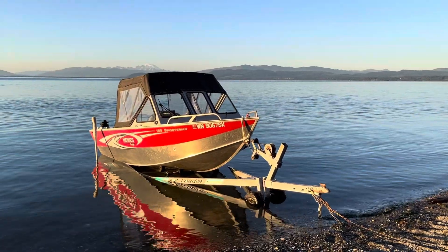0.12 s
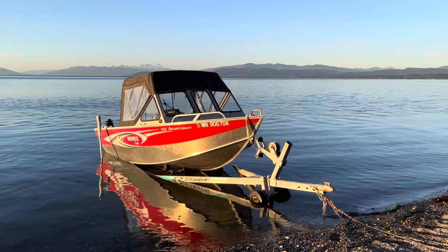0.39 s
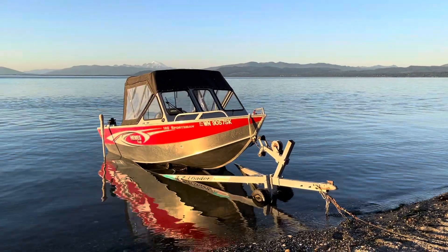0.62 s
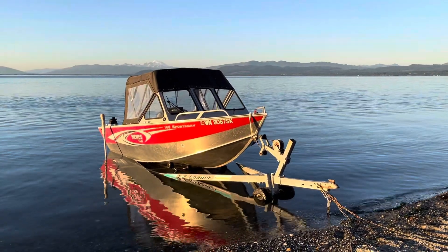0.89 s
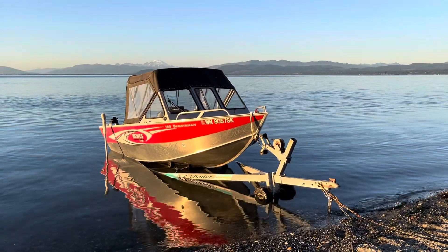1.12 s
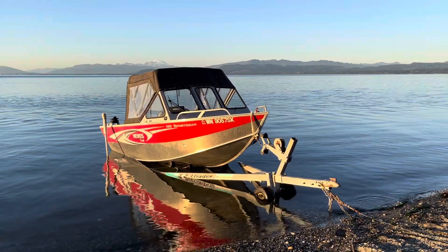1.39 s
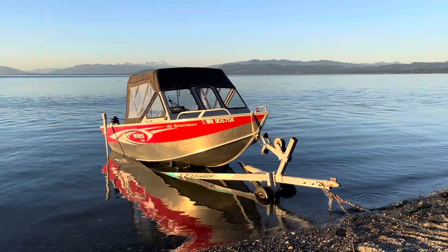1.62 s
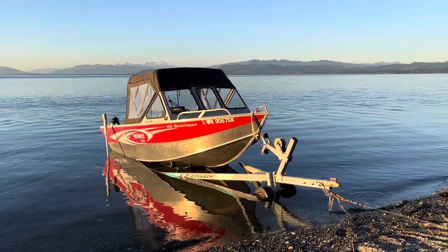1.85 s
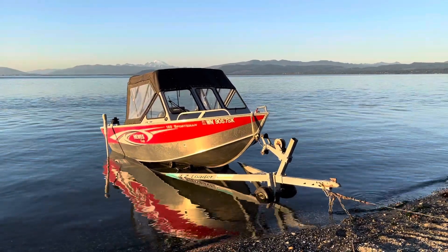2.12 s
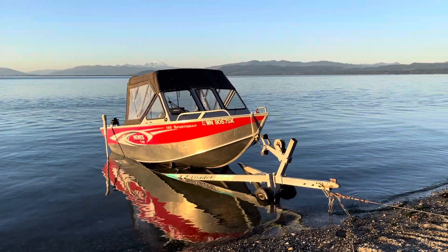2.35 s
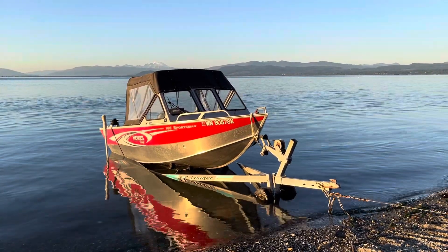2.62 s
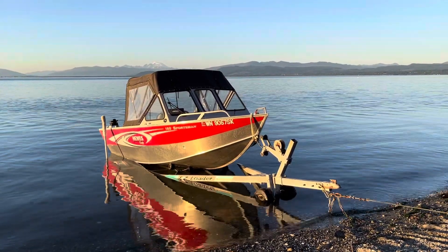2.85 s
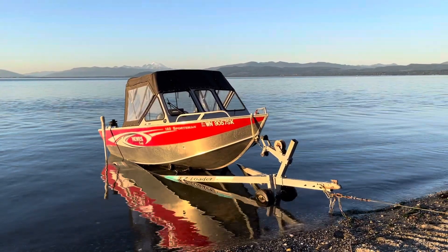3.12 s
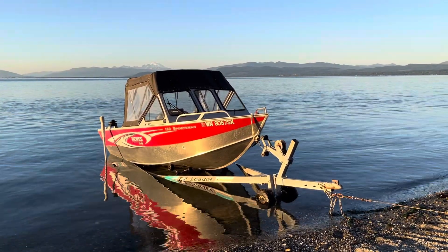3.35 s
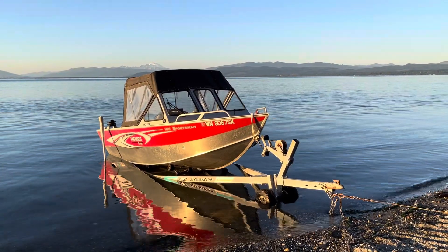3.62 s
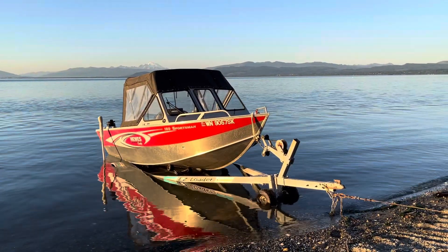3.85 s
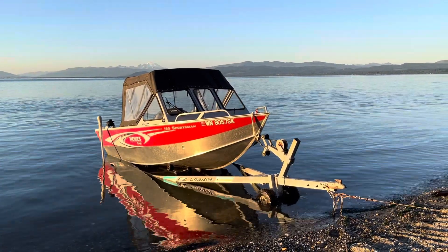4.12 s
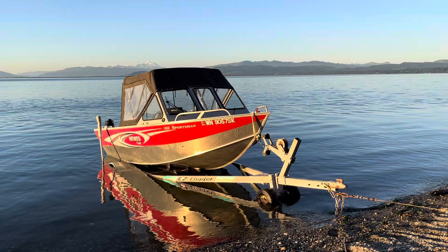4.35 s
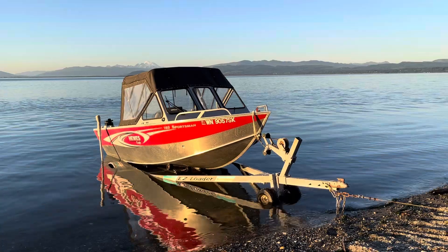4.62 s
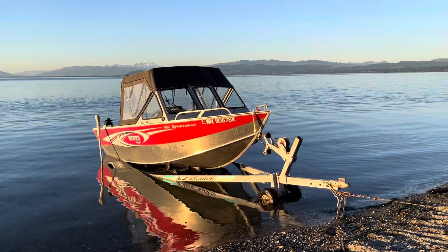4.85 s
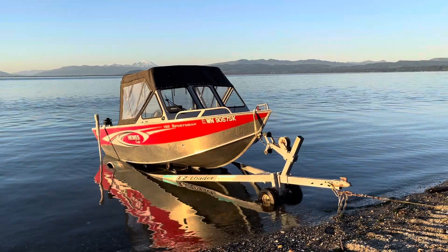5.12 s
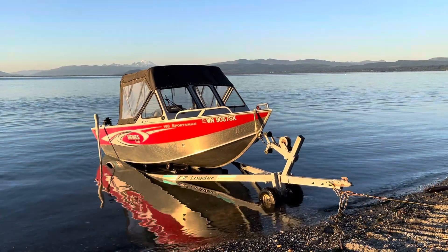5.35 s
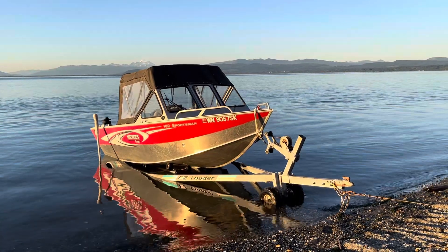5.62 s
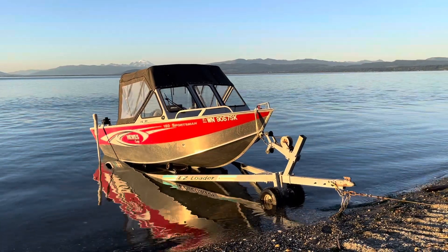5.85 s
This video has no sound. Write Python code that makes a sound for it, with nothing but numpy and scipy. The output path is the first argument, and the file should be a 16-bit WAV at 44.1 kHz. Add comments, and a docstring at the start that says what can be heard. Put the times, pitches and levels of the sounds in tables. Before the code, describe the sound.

A vehicle idles on a shingle beach, then a chain thumps tight and a metal trailer is dragged up with crunching gravel and clanking knocks.

```python
"""A vehicle idles on a shingle beach, then takes up the slack with a thump and drags a boat trailer up on a chain.
Its drone, clatter and hums are shaped noise and wavering sines; stones grind, crackle and snap as shaped noise.
Chain thumps and pings are damped sines, squeals are narrow bands of noise that swell as the steel rubs,
and the trailer frame is a set of resonances struck by short bursts of noise, one mode ringing on as a damped sine.
Two ports of a small microphone hear it all, vehicle to the right, with a lag and a likeness that change with pitch."""
import sys
import numpy as np
from scipy import signal
from scipy.fft import rfft, irfft, next_fast_len
from scipy.io import wavfile
from scipy.ndimage import map_coordinates

SR = 44100
rng = np.random.default_rng(int(sys.argv[2]) if len(sys.argv) > 2 else 0)


def digitize_waveform(pressure):
    """Quantize a signal to 16-bit integers and store it at the path in sys.argv[1].

    Rows of a 2-D input are taken as channels; values are limited to [-1, 1].
    """
    field = np.atleast_2d(pressure).T
    bounded = np.clip(field, -1, 1)
    quanta = np.round(bounded * 32767).astype(np.int16)
    wavfile.write(sys.argv[1], SR, quanta)


def decibels_to_gain(level_db):
    """Convert a level in decibels to a linear amplitude gain (20 dB per decade)."""
    exponent = np.asarray(level_db, float) / 20
    return 10 ** exponent


N = 263718
T = np.arange(N) / SR
LOAD_HZ = 116.4  # the exhaust note under load

# How hard the steel rubs, swelling about once a second. Each row: time in seconds, rub in dB.
RUB = [(1.16, -71), (1.58, -66), (1.66, -71), (1.86, -70), (1.92, -64.5), (2.25, -64.5), (2.66, -65.5),
       (3.0, -71), (3.4, -64.5), (3.55, -65), (3.75, -69), (4.02, -67.5), (4.25, -63.5), (4.4, -65),
       (4.7, -71), (4.9, -68.5), (5.1, -66), (5.3, -62.5), (5.62, -68), (5.95, -64.5)]
# Resonances of the trailer frame. Each row: centre in Hz, width in Hz, relative level in dB.
FRAME = [(825, 26, 5), (828, 172, 0), (958, 12, -0.5), (1193, 46, 2), (1290, 12.6, 2), (1381, 13, 9),
         (1235, 780, -7.5), (1397, 22, 7), (1572, 10, 0.5), (1834, 21, -1), (2211, 22, 1), (2286, 68, -4.5),
         (2170, 350, -10.5), (2390, 56, 6), (2513, 28, 6), (2556, 39, 0.5), (2850, 39, 1), (3126, 41, -3.5),
         (3400, 83, -1.5), (3470, 2340, -10), (3760, 60, -7), (4597, 46, -5.5), (5200, 41, -22)]


def unit(x):
    """Scaled to rms 1."""
    return x / np.sqrt(np.mean(x ** 2) + 1e-20)


def along(points, hz):
    """Values between (Hz, value) points, on a log frequency axis."""
    f, v = np.transpose(points)
    return np.interp(np.log(hz + 1), np.log(f + 1), v)


def curves(rows):
    """One gain per sample for each dB column, at -120 dB before the first row."""
    s, *cols = np.transpose(rows)
    return [decibels_to_gain(np.interp(T, s, c, left=-120)) for c in cols]


def wobble(rate):
    """A smooth random curve with rate knots a second, at most 60."""
    knots = rng.standard_normal(int(N * 60 / SR) + 4)
    return map_coordinates(knots, [T * min(rate, 60)])


def filtered(x, response):
    """x times a complex response of frequency."""
    m = next_fast_len(N + 8192)
    return irfft(rfft(x, m) * response(np.fft.rfftfreq(m, 1 / SR)), m)[..., :N]


def modes(table):
    """Causal response of resonances (Hz, width Hz, dB), summed with alternating sign."""
    def response(f):
        return sum((-1) ** k * decibels_to_gain(db) * 1j * f * width / (hz * hz - f * f + 1j * f * width)
                   for k, (hz, width, db) in enumerate(table))
    return response


def even(response):
    """The response scaled so that white noise keeps its level."""
    def scaled(hz):
        gain = response(hz)
        return gain / np.sqrt(np.mean(abs(gain) ** 2))
    return scaled


def noise():
    """Two unrelated draws: the direct path and the scattered one."""
    return rng.standard_normal((2, N))


def coloured(x, spectrum):
    """x through a spectrum, rms 1."""
    return unit(filtered(x, lambda hz: decibels_to_gain(along(spectrum, hz))))


def grit(rate, spread_db):
    """Single stone contacts at random moments, rate a second, some larger than the rest."""
    hit = rng.random(N) < rate / SR
    size = np.minimum(rng.exponential(size=N), 3)
    return unit(hit * decibels_to_gain(spread_db * size) * noise())


def ring(s, db, hz, t60, attack):
    """A damped sine that starts at s and dies by 60 dB in t60 seconds."""
    t = np.clip(T - s, 0, None)
    return decibels_to_gain(db - 60 * t / t60) * (1 - np.exp(-t / attack)) * np.sin(2 * np.pi * hz * t)


def engine(drone):
    """Exhaust rumble in the body's resonances, a few unsteady hums and the idle's clatter."""
    # Colour of the rumble. Each row: pitch in Hz, relative dB per Hz.
    drone_colour = [(20, -29), (45, -7.5), (62, 2.5), (100, -2.5), (200, -1), (270, -2.5), (340, -5),
                    (420, -8), (510, -15.5), (620, -11.5), (800, -18.5), (1100, -35), (1600, -56.5)]
    # Body resonances in the rumble. Each row: centre in Hz, width in Hz, level in dB.
    booms = [(118.1, 4.7, 3), (160.3, 20, -8.5), (305.5, 10, -2)]
    # The exhaust note under load. Each row: time in seconds, level in dB before the 2 dB cut below.
    load = [(1.4, -68), (1.73, -36.5), (2.14, -63), (2.32, -33), (2.65, -54), (2.94, -37.5), (3.11, -43),
            (4.1, -39), (4.25, -32), (4.93, -43.5), (5.16, -33), (5.58, -49), (5.73, -30), (5.98, -42)]
    # Each row: pitch in Hz, rms in dB before fade and fade-in, start in seconds, waver in radians, fade in dB per s.
    hum_rows = [(85.46, -51, -0.9, 2.03, 5), (218.2, -42, 0.52, 0.86, 1), (306.3, -53.5, 1.14, 1.8, 2),
                (362.8, -49.5, 0.88, 0.32, 0)]
    # Colour of the clatter. Each row: pitch in Hz, relative dB per Hz.
    idle_colour = [(300, -70), (600, 7.5), (850, -34), (1050, -10.5), (1450, -2), (2100, -13.5),
                   (2600, -29), (3000, -36), (4400, -23), (6000, -44), (8000, -61), (12000, -83),
                   (16000, -67)]
    # Thin whistles in the clatter. Each row: centre in Hz, width in Hz, level in dB.
    fan = [(3350, 35, 15), (5150, 70, 5)]

    rumble = unit(filtered(coloured(noise(), drone_colour), lambda f: 1 + abs(modes(booms)(f))))
    rumble = drone * decibels_to_gain(1.6 * wobble(8)) * rumble

    load_level = curves(load)[0] * decibels_to_gain(3 * wobble(14) - 2)
    hums = load_level * np.sin(2 * np.pi * LOAD_HZ * T + 1.1 * wobble(12))
    for hz, db, start, waver, fade_db in hum_rows:
        phase = 2 * np.pi * hz * T + waver * wobble(7)
        level = decibels_to_gain(db - fade_db * T + 2 * wobble(4.786)) * np.sqrt(2)
        fade_in = np.clip((T - start) / (start + .3), 0, 1)  # a start below -0.3 s leaves the hum silent
        hums = hums + level * np.sin(phase) * fade_in

    clatter = filtered(coloured(noise(), idle_colour), lambda f: 1 + abs(modes(fan)(f)))
    clatter = decibels_to_gain(-55.5 + 0.22 * wobble(17.0)) * clatter
    return rumble + hums + clatter


def gravel(crunch, crackle):
    """Stones grind under the load in clumps; small ones crackle, and single snaps stand out."""
    # Colours of the grinding, the crackle and the snaps. Each row: pitch in Hz, relative dB per Hz.
    crunch_colour = [(400, -24), (800, -2.5), (1100, -4.5), (1430, 3), (1750, -10.5), (2450, -9),
                     (2650, -11.5), (3100, -17), (3800, -22.5), (5000, -20), (6500, -27), (9000, -54),
                     (9900, -55), (11000, -38)]
    crackle_colour = [(2500, -7), (4000, -0.5), (5500, -5), (7000, 2), (8500, -1.5), (10500, -2),
                      (12300, -3.5), (13200, -13), (14200, -7), (15600, -20)]
    snap_colour = [(2000, -25), (3500, -4), (5000, -10.5), (7500, 9), (10000, -3.5), (12500, 0),
                   (14000, -11), (15700, -11)]
    # The loudest snaps, of stones and at the onset of some blows. Each row: start in seconds, starting level in dB.
    loud_snaps = [(0.9852, -53), (1.091, -50), (1.1682, -52), (1.617, -43), (1.659, -43), (1.751, -44),
                  (1.7605, -49), (1.782, -42), (1.787, -35), (1.795, -34), (1.8055, -42), (1.808, -34),
                  (1.819, -34), (1.821, -34), (1.8255, -34), (1.8285, -32), (1.831, -38), (1.8415, -51),
                  (1.847, -38), (1.851, -42), (1.9155, -34.5), (1.931, -47), (1.9724, -28), (1.987, -47),
                  (1.9955, -44), (2.006, -41), (2.012, -41), (2.027, -38), (2.7895, -39), (3.031, -43),
                  (3.1377, -37), (3.2291, -46.5), (3.6993, -45), (3.8106, -45), (3.8456, -38), (4.42, -40),
                  (4.656, -46), (4.7576, -49), (4.941, -42), (5.342, -46), (5.5464, -43)]

    clumps = decibels_to_gain(2 * wobble(23) + 1.8 * wobble(9))
    grind = clumps * coloured(noise() + 0.21 * grit(900, spread_db=1.5), crunch_colour)

    flicker = decibels_to_gain(0.24 * wobble(13) + 1.8 * wobble(23))
    fizz = flicker * coloured(noise() + 0.79 * grit(500, spread_db=3.0), crackle_colour)

    # scattered lesser snaps lie 17 dB under the crackle's curve
    snaps = decibels_to_gain(-17) * crackle * grit(60, spread_db=2)
    t = np.arange(88) / SR
    bursts = rng.standard_normal((len(loud_snaps), 2, len(t)))
    for (s, db), burst in zip(loud_snaps, bursts):
        snaps[:, round(s * SR):][:, :len(t)] += decibels_to_gain(db - 60 * t / 0.0074) * unit(burst)
    snaps = filtered(snaps, even(lambda hz: decibels_to_gain(along(snap_colour, hz))))
    return crunch * grind + crackle * fizz + snaps


def chain():
    """The chain snaps tight with low thumps and loose links ping, all as damped sines."""
    # A first small tick of steel: start in seconds, level in dB, pitch in Hz, t60 in seconds.
    tick = (0.949, -53, 3150, .04)
    # The slack taken up. Each row: start in seconds, level in dB, pitch in Hz, t60 in seconds.
    thump_rows = [(1.197, -17, 125.5, 0.1), (1.216, -15, 150, 0.11), (1.233, -23, 297, 0.049),
                  (1.262, -16, 153, 0.025), (1.285, -15, 122.4, 0.056), (1.293, -31, 63.4, 0.39)]
    # Chain links. Each row: start in seconds, level in dB.
    pings = [(2.507, -50), (2.577, -50), (3.938, -54), (3.975, -46), (4.14, -49)]
    # Tones of one link. Each row: pitch in Hz, relative level in dB, t60 in seconds.
    link = [(8650, 0, .08), (9100, -2, .07)]

    thumps = sum(ring(*row, attack=0.0012) for row in thump_rows)
    links = sum(ring(s, db + level, hz, t60, attack=0.000097)
                for s, db in pings for hz, level, t60 in link)
    return thumps + ring(*tick, attack=0.001) + links


def squeals():
    """Rubbing steel slips unevenly and shakes with the engine's cycle, four exhaust beats long."""
    # Each row: pitch in Hz, width in Hz, shake 0-1, level in dB at a rub of -66 dB, dB gained per dB of rub.
    squeal_rows = [(5990, 70, 0, -67, 1.44), (5245, 31, 0, -80, 0.5), (4410, 50, 0.3, -67.5, 2),
                   (7737, 100, 0.05, -64.5, 2), (9900, 400, 0.6, -77.5, 2.3)]
    rub = curves(RUB)[0] / decibels_to_gain(-66)
    cycle = np.sin(2 * np.pi * LOAD_HZ / 4 * T + wobble(3))
    out = np.zeros((2, N))
    for hz, width, shake, db, grows in squeal_rows:
        band = unit(filtered(noise(), lambda f: abs(modes([(hz, width, 0)])(f)) ** 1.7))
        flutter = decibels_to_gain(3 * wobble(40))
        out += decibels_to_gain(db) * rub ** grows * (1 + shake * cycle) * flutter * band
    return out * (T > RUB[0][0])


def jolts():
    """Stones under the moving trailer keep shaking its frame."""
    shaken = unit(filtered(grit(300, spread_db=2.5), modes(FRAME)))
    return shaken * decibels_to_gain(3 * wobble(14)) * (T > RUB[0][0])


def trailer():
    """Each blow is a hard first contact and a short rattle; they drive four groups of modes and a broad clash."""
    # Blows. Each row: start in seconds, main ring, low ring and clash in dB, seconds for the rattle to lose
    # 20 dB (5 ms at least).
    knocks = [(1.165, -69, -72, -63, 0.027), (1.2088, -50, -48, -60, 0.04), (1.242, -50, -53, -65, 0.034),
              (1.375, -53, -47.5, -72.5, 0.035), (1.4341, -51, -50, -63, 0.037),
              (1.575, -51, -48, -65, 0.04), (1.976, -45.5, -49, -65, 0.053),
              (2.024, -48.5, -52, -59, 0.047), (2.1287, -46, -58, -70, 0.037),
              (2.187, -45, -59, -70, 0.021), (2.238, -43, -60, -66, 0.027), (2.2834, -48, -43, -69, 0.021),
              (2.379, -43.5, -45, -60.5, 0.038), (2.436, -47, -39.5, -57.5, 0.06),
              (2.504, -39, -39, -43.5, 0.023), (2.5225, -52, -33, -48, 0.0071),
              (2.5737, -36, -34.5, -41.5, 0.037), (2.798, -39, -35, -46, 0.016),
              (2.8975, -45, -55, -70, 0.032), (2.933, -44, -77, -85, 0.028),
              (2.992, -47, -52.5, -72, 0.096), (3.0948, -28.5, -33, -47.5, 0.027),
              (3.138, -39.5, -63, -58, 0.021), (3.1971, -50, -51, -64, 0.052),
              (3.254, -43, -64, -65, 0.041), (3.31, -57, -63, -72, 0.023), (3.395, -46.5, -56, -65, 0.045),
              (3.435, -54, -57, -70, 0.081), (3.5462, -51, -52, -62, 0.037),
              (3.6372, -44.5, -62, -68, 0.024), (3.7649, -49.5, -47, -72, 0.035),
              (3.8162, -44.5, -43, -65, 0.069), (3.8518, -32.5, -35, -54.5, 0.025),
              (3.936, -33, -34, -45.5, 0.034), (4.158, -35.5, -42, -61, 0.02),
              (4.2502, -33.5, -40, -53.5, 0.037), (4.319, -38, -43, -55, 0.044),
              (4.4226, -28, -41, -51, 0.023), (4.6023, -41, -37.5, -61, 0.028),
              (4.6561, -40.5, -34.5, -46, 0.049), (4.675, -38, -36.5, -68, 0.036),
              (4.693, -42, -27, -61, 0.017), (4.7143, -45, -52, -70, 0.1), (4.807, -35, -30, -46, 0.014),
              (4.937, -39.5, -37, -55.5, 0.038), (5.2537, -36.5, -35, -50.5, 0.029),
              (5.5476, -44, -43.5, -68, 0.047), (5.6168, -51, -52, -72, 0.025),
              (5.7698, -49, -53.5, -61.5, 0.037), (5.84, -40.5, -41, -54, 0.047)]
    # Main, low, high and deep ring. Each row: from Hz, to Hz.
    ring_bands = [(1750, 2700), (1100, 1750), (2700, 6000), (700, 1100)]
    # Colour of the clash. Each row: pitch in Hz, relative dB per Hz.
    clash_colour = [(500, -8), (800, -15), (1500, -4), (3300, -28), (5000, 0), (6000, -14), (7500, -22),
                    (10000, -9), (15500, -43)]
    # Blows after which the frame's 956 Hz mode rings on. Each row: start in seconds, level in dB.
    tolls = [(3.1, -53.5), (3.95, -51.5), (4.26, -61), (4.69, -54), (5.257, -64)]
    high_db, deep_db = 8, -6  # high ring over the clash, deep ring over the low one
    scatter_db = 2  # each blow lands elsewhere and favours other modes

    size = 2 ** 14
    t, hz = np.arange(size) / SR, np.fft.rfftfreq(size, 1 / SR)
    each = np.array([(-1) ** k * modes([m])(hz) for k, m in enumerate(FRAME)])
    group = np.array([[lo < m[0] < hi for m in FRAME] for lo, hi in ring_bands])
    group = group / np.sqrt(np.mean(abs(group @ each) ** 2, axis=1))[:, None]
    clash = even(lambda f: decibels_to_gain(along(clash_colour, f)))(hz)
    rise = 1 - np.exp(-t / 0.004)
    contact = 0.78 * decibels_to_gain(-20 * t / 0.0017)

    out = np.zeros((2, N + size))
    for s, main_db, low_db, clash_db, rattle in knocks:
        levels = decibels_to_gain(np.array([main_db, low_db, clash_db + high_db, low_db + deep_db])) @ group
        favour = decibels_to_gain(scatter_db * np.clip(rng.standard_normal(len(FRAME)), -2, 1.5))
        path = (levels * favour) @ each + decibels_to_gain(clash_db) * clash
        stroke = rise * decibels_to_gain(-20 * t / max(rattle, .005)) + contact
        force = stroke * (t < 1 / 8) * rng.standard_normal((2, size))
        out[:, round(s * SR):][:, :size] += irfft(rfft(force) * path, size)
    # this long ring takes the direct path only
    out[0, :N] += sum(ring(s, db, hz=956, t60=1, attack=0.0068) for s, db in tolls)
    return out[:, :N]


def ports(paths, lead, alike, tilt):
    """The ports share the direct path, split the scattered one, and differ in phase and level."""
    def response(hz):
        turn = np.arccos(np.clip(along(alike, hz), 0, 1)) / 2
        direct, scattered = np.cos(turn), np.sin(turn)
        # half the tilt and lead on the left port, the inverse half on the right
        shift = decibels_to_gain(along(tilt, hz) / 2) * np.exp(.5j * np.interp(hz, *np.transpose(lead)))
        left = shift * np.array([direct, scattered])
        right = np.array([direct, -scattered]) / shift
        return np.array([left, right])
    return filtered(paths, response).sum(axis=1)


def scene():
    """The vehicle, chain and stones on the right, the trailer ahead."""
    # The pull up the beach. Each row: time in seconds, then drone, crunch and crackle in dB.
    pull = [(0.0, -39, -55.5, -74.5), (0.3, -42.5, -73, -87), (0.93, -40.5, -65.5, -78),
            (0.96, -39.5, -62, -80), (1.0, -40, -59, -69), (1.15, -44, -62, -72),
            (1.17, -32.5, -53.5, -52.5), (1.25, -33, -53, -71.5), (1.74, -38, -54.5, -55.5),
            (1.82, -32.5, -48, -46.5), (1.87, -38, -48.5, -54.5), (2.03, -36.5, -50.5, -58),
            (2.08, -36, -46.5, -65), (2.38, -36.5, -50, -68), (2.53, -39, -45, -54.5),
            (2.67, -37, -55, -62), (2.9, -36.5, -50.5, -60.5), (3.3, -35, -50.5, -69.5),
            (3.63, -36.5, -54.5, -66), (3.9, -34.5, -49, -67), (4.5, -36, -48, -66),
            (5.3, -36, -52.5, -73.5), (5.98, -34.5, -49.5, -65.5)]
    # Phase from the right and from ahead. Each row: pitch in Hz, radians the left port leads (minus: lags).
    lead_right = [(0, 0), (750, -2.9), (1200, -2.4), (1550, -3.1), (1800, -5.7), (2800, -5.4), (3300, -6.3),
                  (4000, -7.7), (4300, -9.4), (4600, -9.5), (5200, -12.3), (5700, -14), (6200, -14.3),
                  (6800, -15.2), (7500, -15.6), (8900, -15.8), (11000, -18.8), (13000, -18.9),
                  (13700, -19.5), (14400, -21.9), (16000, -22)]
    lead_ahead = [(0, 0), (1000, .8), (1500, -1.7), (1800, .1), (2700, .7), (3000, 0), (5000, .1),
                  (5400, -1.4), (7000, -2), (7700, -3.1), (8900, -3.2), (11000, -6.2), (13000, -6.3),
                  (14400, -9.3)]
    # Likeness of the ports for sound from the right. Each row: pitch in Hz, likeness 0-1.
    alike_right = [(100, 1), (700, 0.95), (1200, 0.76), (1500, 0.62), (1700, 0.85), (2400, 0.83),
                   (3500, 0.19), (5000, 0.77), (6000, 0.47), (6500, 0.86), (7200, 0.94), (9500, 0.96),
                   (12000, 0.95), (13800, 0.35), (15000, 0.73)]
    # Balance for sound from the right. Each row: pitch in Hz, left minus right in dB.
    tilt_right = [(60, -.5), (400, -1), (600, 5.5), (1050, -3), (1500, -1.5), (1750, 2), (2300, -2),
                  (3000, 2), (4500, 3), (5300, 0.5), (15000, 2.5)]

    drone, crunch, crackle = curves(pull)
    chain_paths = chain() * [[1], [0]]  # direct path only
    right = engine(drone) + gravel(crunch, crackle) + squeals() + chain_paths
    ahead = trailer() + decibels_to_gain(-15.0) * crunch * jolts()
    heard_right = ports(right, lead_right, alike_right, tilt_right)
    heard_ahead = ports(ahead, lead_ahead, alike=[(1000, 1.0), (2500, 0.88)], tilt=[(1000, -3.0), (5000, -0.5)])
    return heard_right + heard_ahead


def top_cut(x):
    """Nothing passes above the cut-off."""
    return signal.sosfilt(signal.butter(12, 15820, fs=SR, output="sos"), x)


def record(dry):
    """The microphone loses the deepest bass through two equal roll-offs."""
    corner_hz = 38
    sound = filtered(dry, lambda hz: (1j * hz / (corner_hz + 1j * hz)) ** 2)
    return top_cut(sound)


dry = scene()
out = record(dry)
digitize_waveform(out)
```